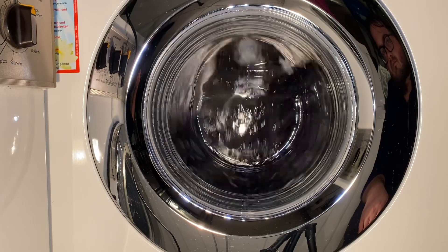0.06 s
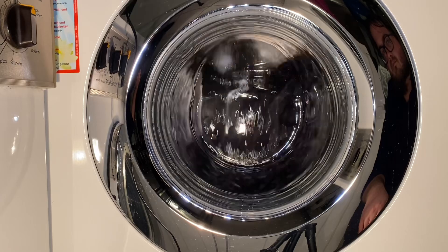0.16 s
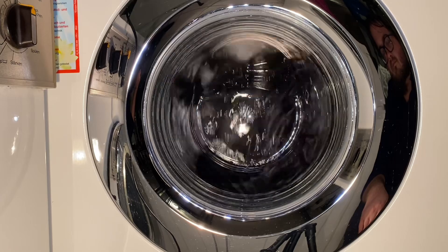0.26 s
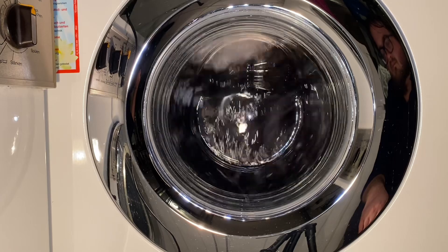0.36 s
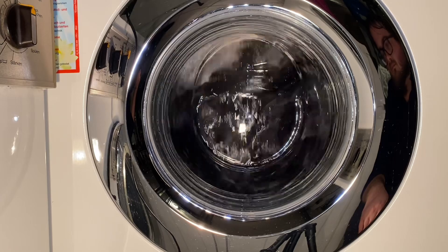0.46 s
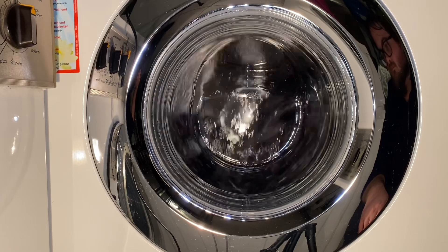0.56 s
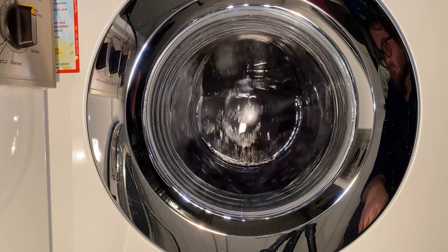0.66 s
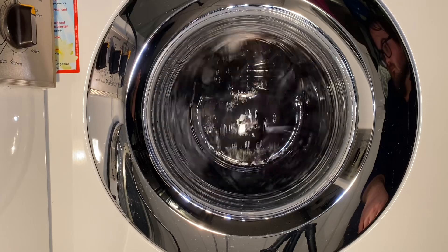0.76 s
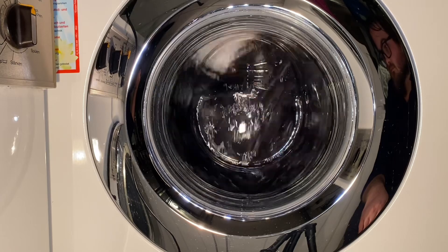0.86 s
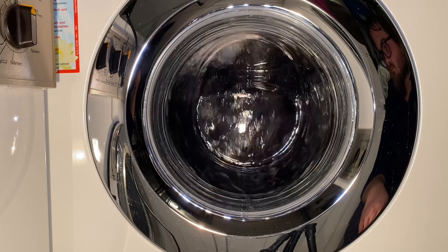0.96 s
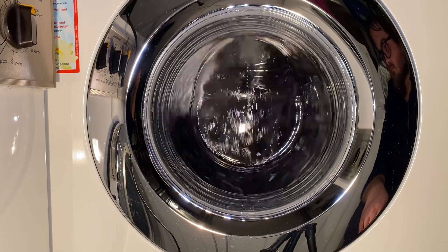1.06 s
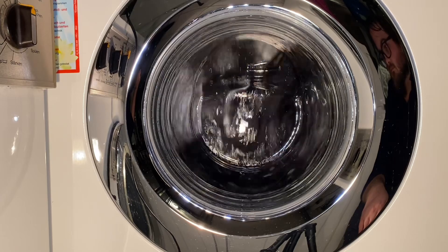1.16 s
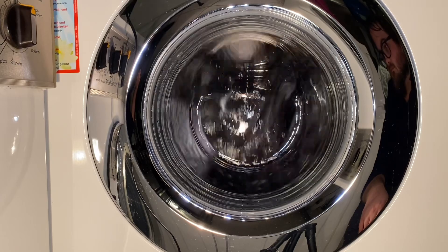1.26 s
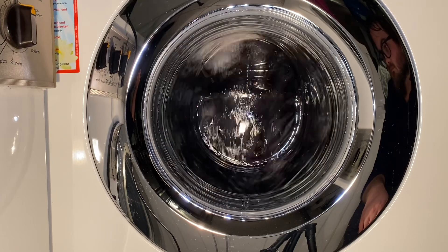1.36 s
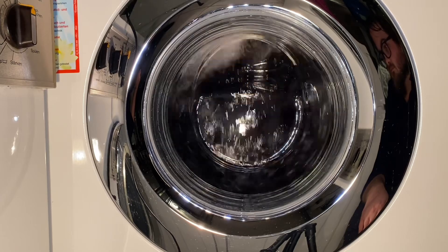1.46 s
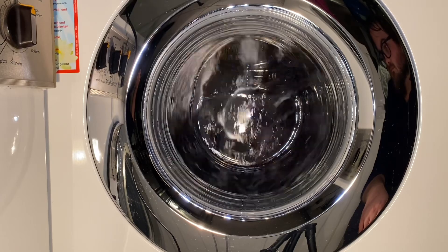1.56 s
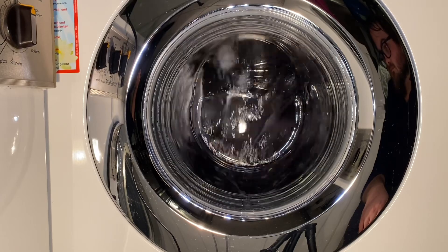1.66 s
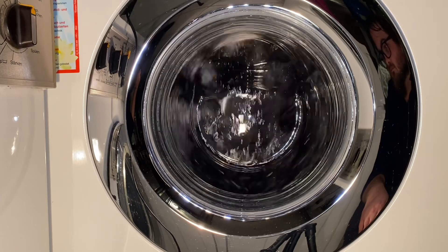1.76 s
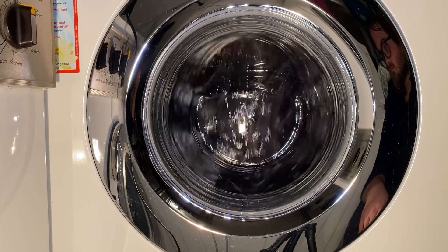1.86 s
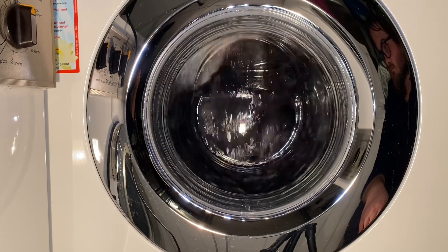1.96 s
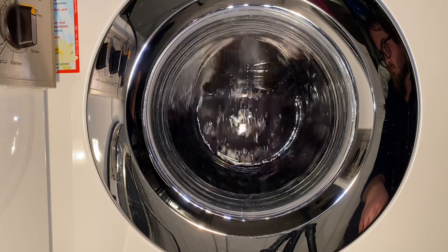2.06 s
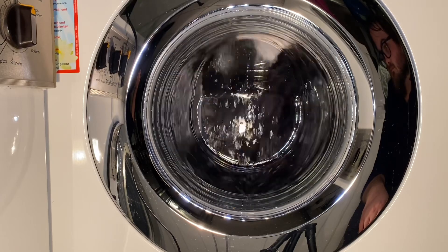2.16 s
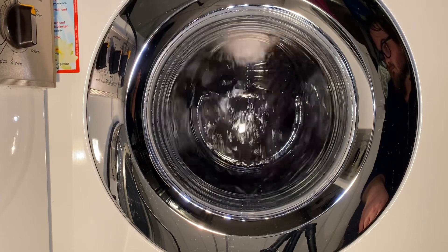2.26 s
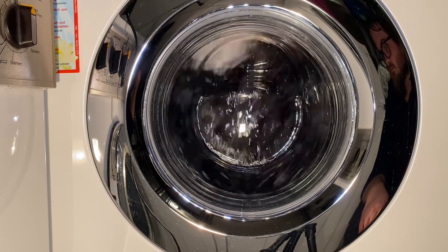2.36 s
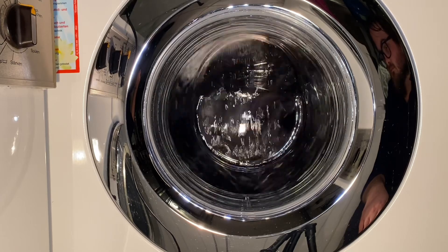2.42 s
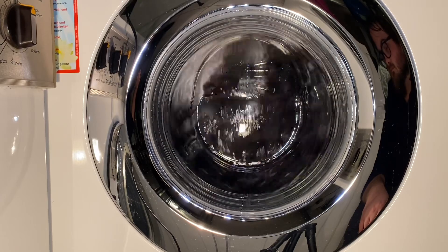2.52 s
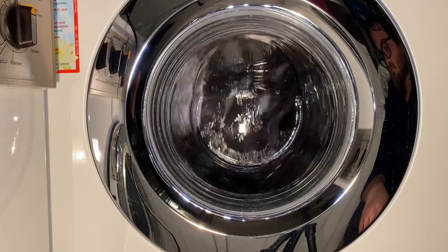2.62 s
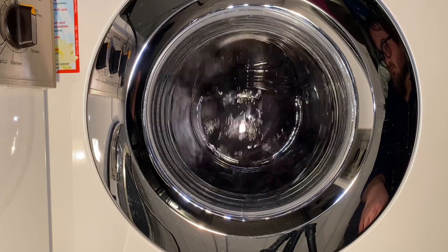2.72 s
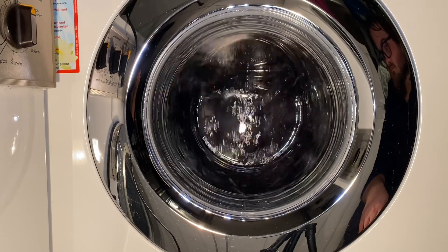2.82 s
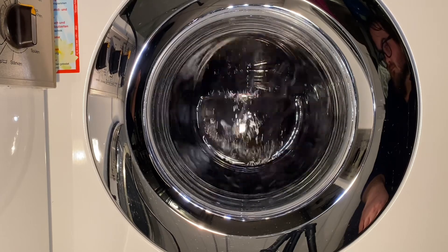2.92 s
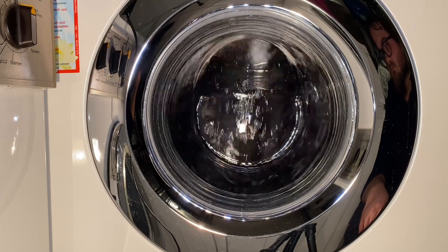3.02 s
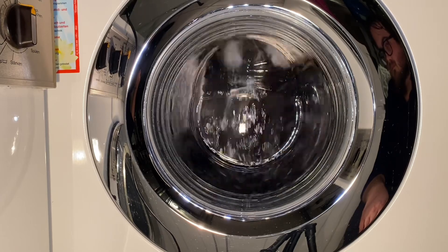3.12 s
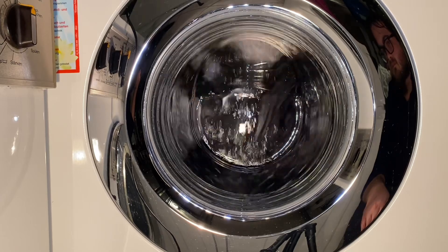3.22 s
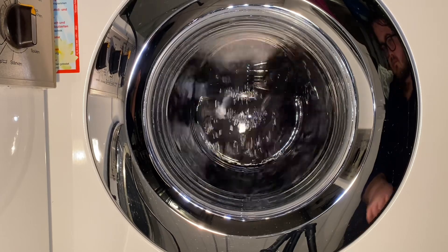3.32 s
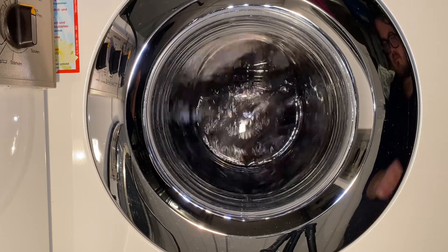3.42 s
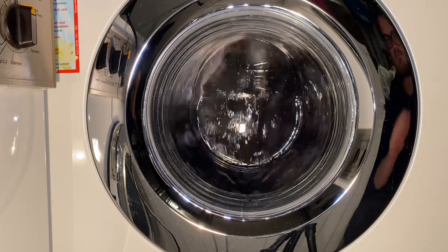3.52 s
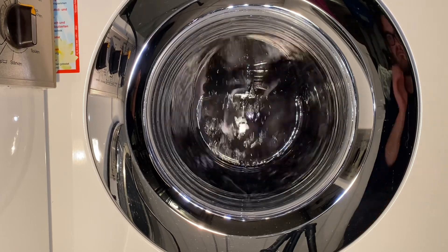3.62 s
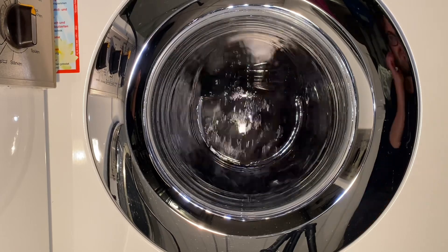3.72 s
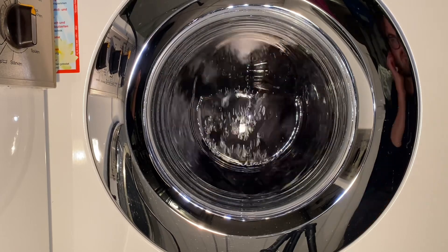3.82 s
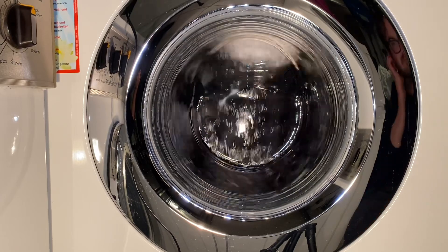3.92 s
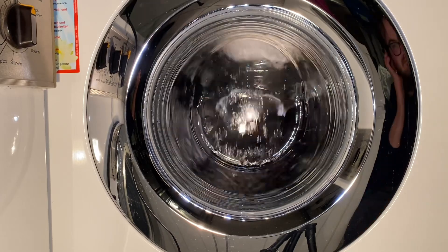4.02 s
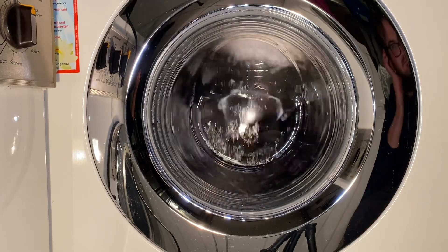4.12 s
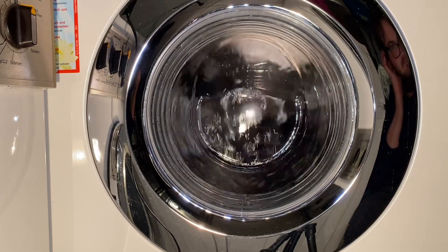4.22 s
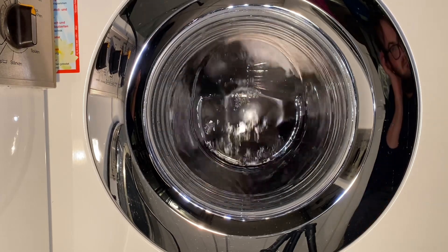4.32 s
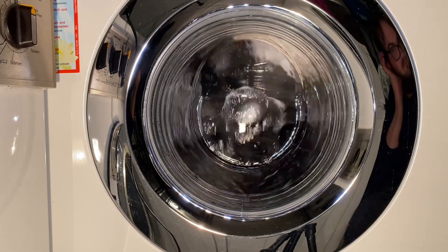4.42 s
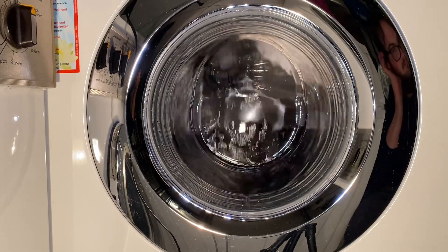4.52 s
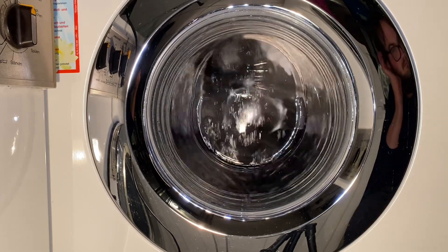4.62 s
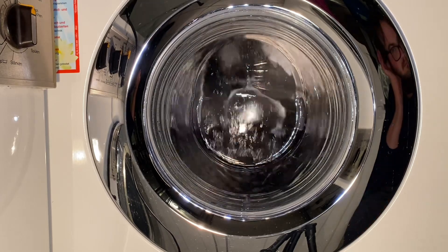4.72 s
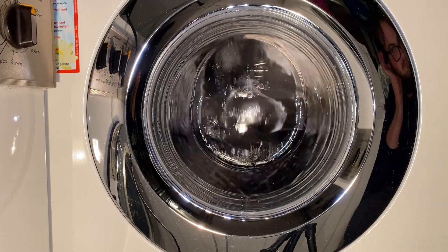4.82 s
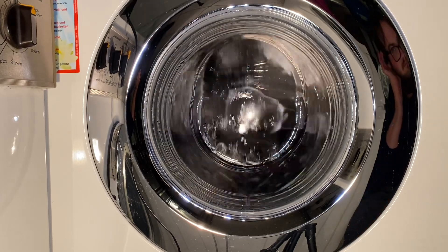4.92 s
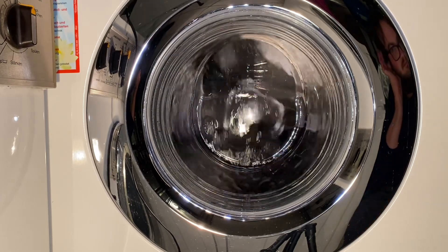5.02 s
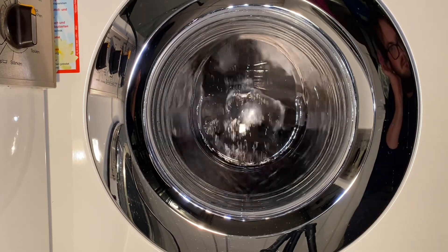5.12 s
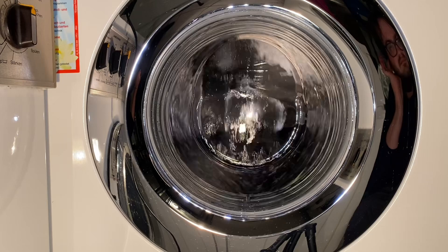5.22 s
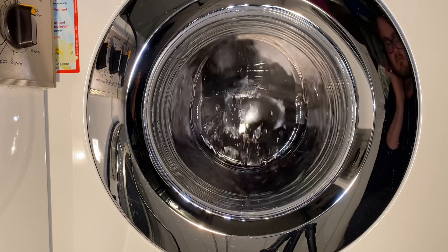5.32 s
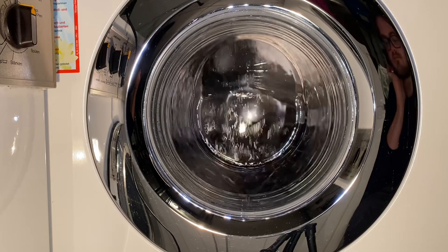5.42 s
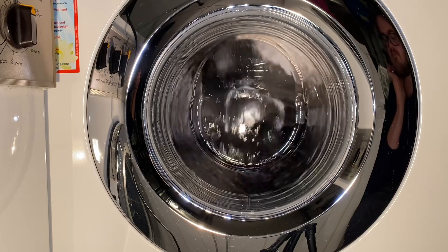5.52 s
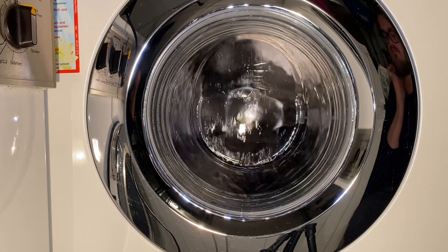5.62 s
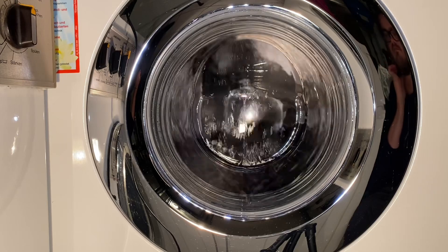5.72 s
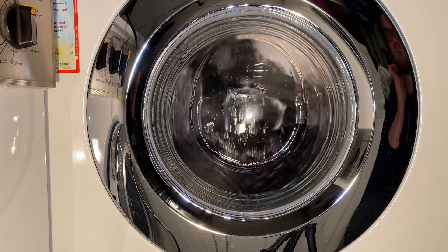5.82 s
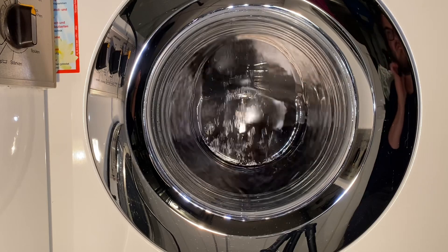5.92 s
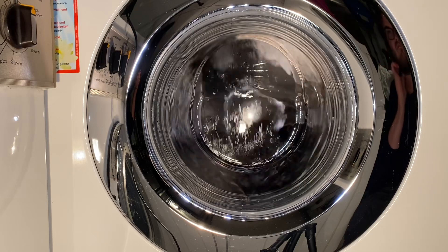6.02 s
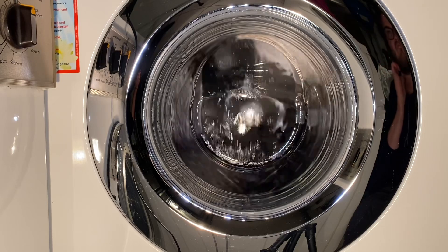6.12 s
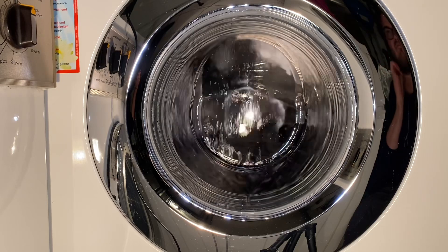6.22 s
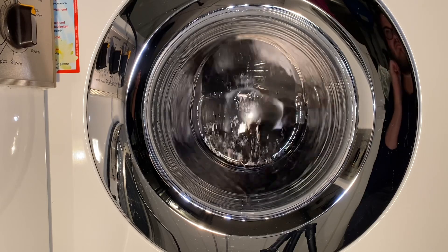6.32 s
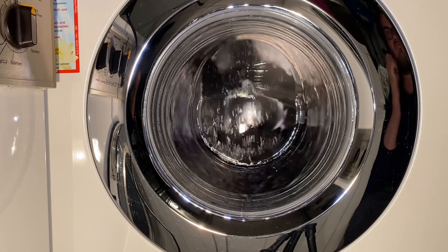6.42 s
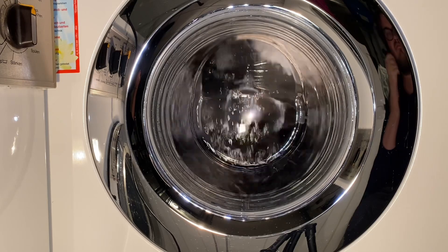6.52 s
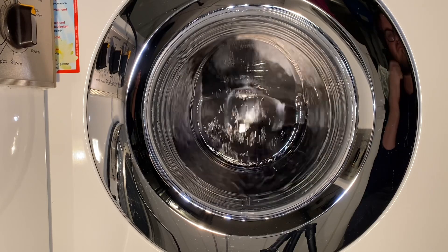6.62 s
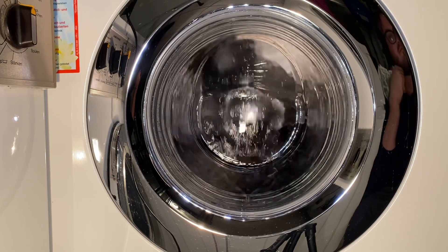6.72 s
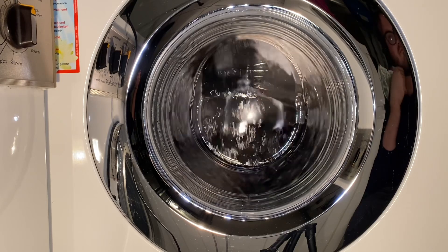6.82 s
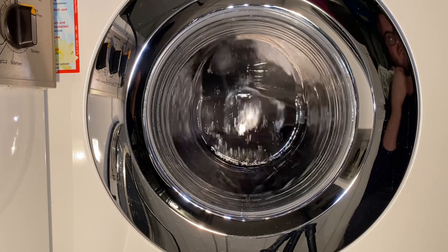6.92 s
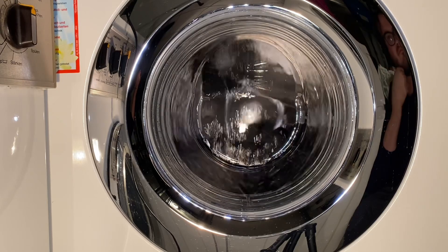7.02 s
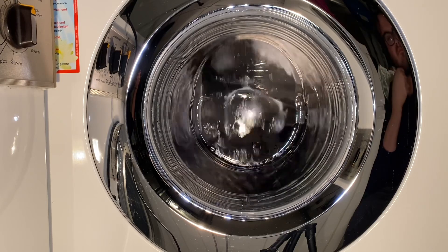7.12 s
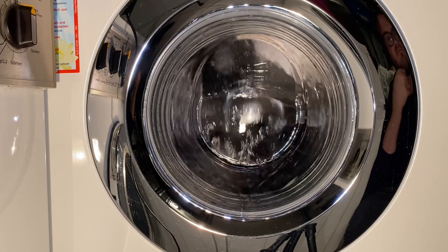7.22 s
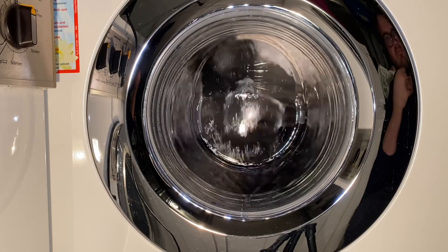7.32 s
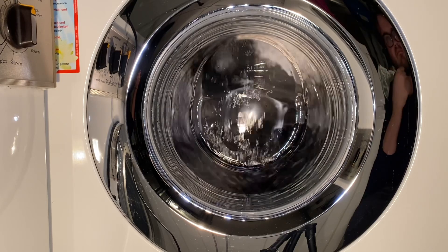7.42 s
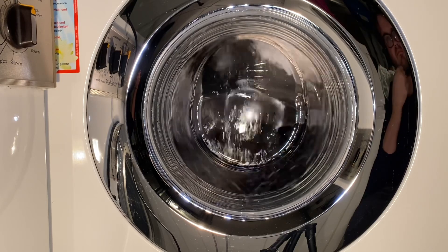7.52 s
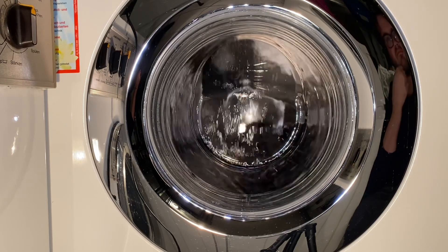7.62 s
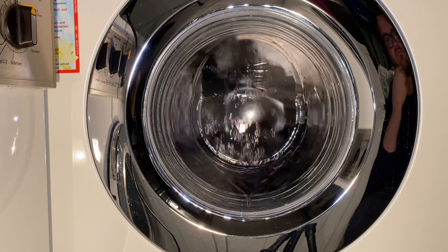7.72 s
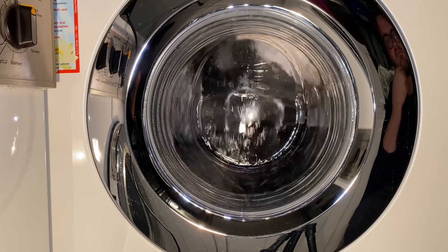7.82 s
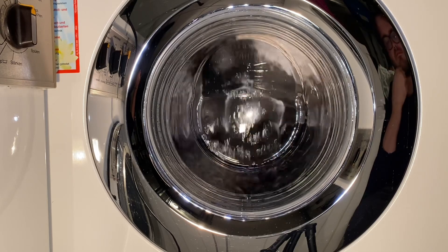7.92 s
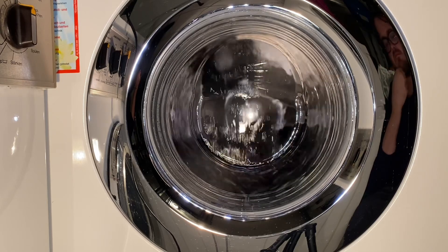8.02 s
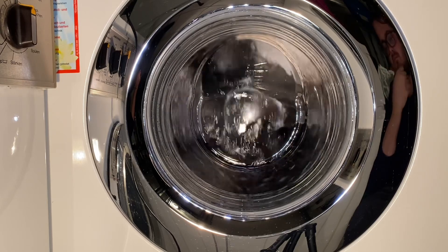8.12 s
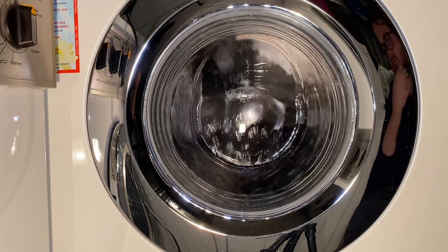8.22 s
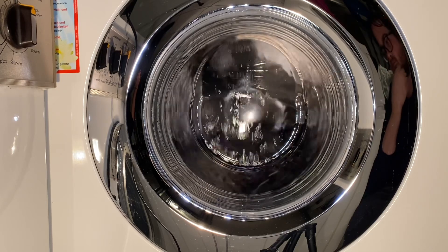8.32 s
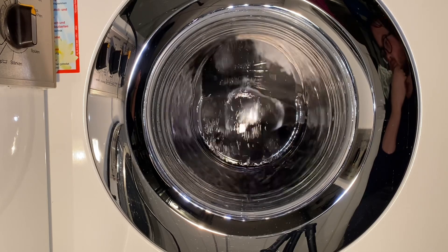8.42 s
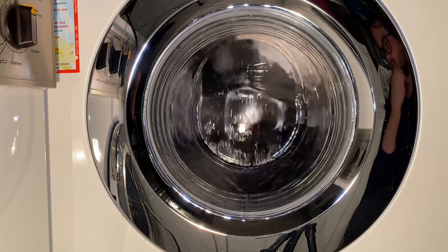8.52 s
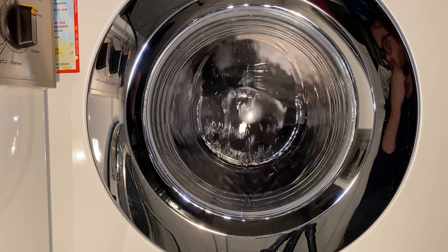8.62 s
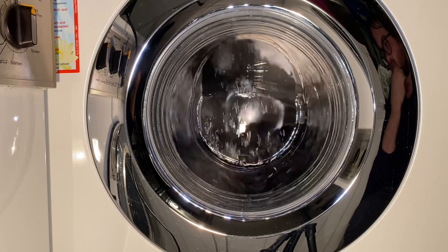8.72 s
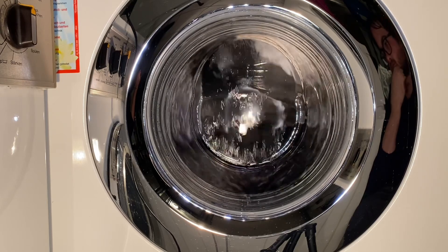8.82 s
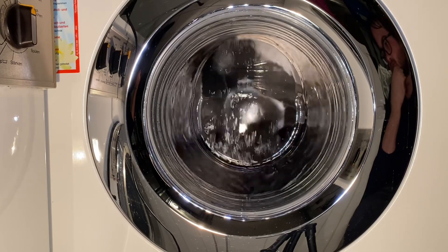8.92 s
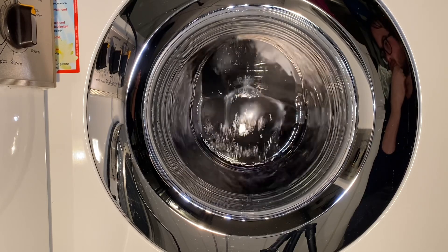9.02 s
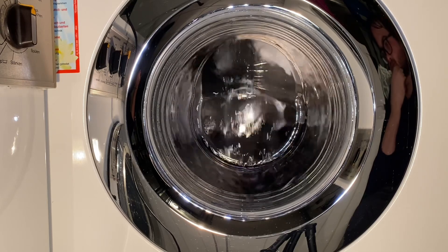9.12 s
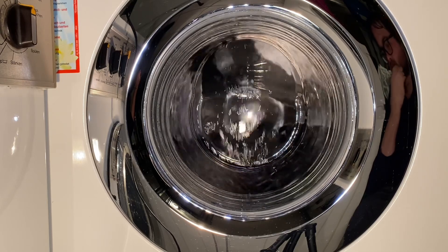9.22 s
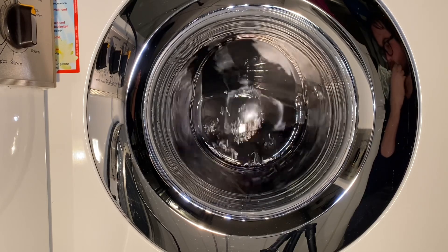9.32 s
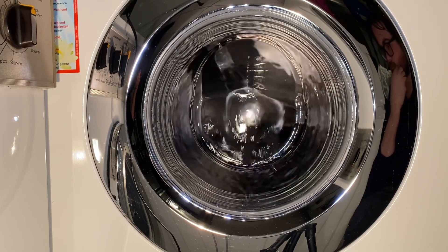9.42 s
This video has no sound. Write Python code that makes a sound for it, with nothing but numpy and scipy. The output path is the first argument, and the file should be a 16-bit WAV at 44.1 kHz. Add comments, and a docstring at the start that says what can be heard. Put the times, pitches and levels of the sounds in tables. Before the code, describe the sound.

Close to a front-loading washing machine in a small home room. Wet laundry flops and thumps in the steel drum for about four seconds, with a few hollow knocks, while water sloshes and sprays brightly and drops tick on metal. Then the thumps stop and hissing patter continues over low hum and rumble. Near the end the treble drops away, leaving faint bass and small ticks.

```python
"""A front-loading washing machine heard from just outside its glass door. Wet laundry thumps in the
steel drum, mostly in the first 4 s: shaped noise and short blows drive modes, knocks ring as decaying sines.
Drops and buttons tap the steel (puffs of noise into wall modes, short noise bursts); water sloshes, patters
and sprays as filtered noise; the cabinet rumbles over a motor hum. Taps, thumps and knocks echo in the room.
Near the end the machine's steady layers fade unevenly, the treble more than the bass."""
import sys
import numpy as np
from scipy import signal
from scipy.fft import rfft, irfft, next_fast_len
from scipy.io import wavfile
from scipy.ndimage import uniform_filter1d, map_coordinates

SR = 44100
rng = np.random.default_rng(int(sys.argv[2]) if len(sys.argv) > 2 else 0)


def wrap_up_sound(samples):
    """Save the sound to the file named by the first command line argument, as 16-bit audio."""
    columns = np.atleast_2d(samples).T
    # keep every value between -1 and 1, then stretch to whole-number steps
    tamed = np.clip(columns, -1, 1)
    steps = np.round(tamed * 32767).astype(np.int16)
    wavfile.write(sys.argv[1], SR, steps)


N = 417186

# modes of drum and door: (frequency [Hz], width [Hz], gain [dB])
DRUM_MODES = [(386, 34, 0.5), (464, 13, -3.5), (526.3, 37.4, 0.5), (613, 370, -20.5), (734, 39, -1),
              (1000, 205, 1), (1160, 35, 2.5), (1249, 30, 1), (1478, 33, 5), (1494, 180, -5.5),
              (1778, 110, -5), (1926, 82, -4.5), (2314, 77, -7), (2378, 55, -7.5), (3000, 250, -27.5),
              (3780, 510, -44), (3920, 15, -7.5)]
# modes of the drum wall in five groups: (frequency [Hz], width [Hz], gain [dB])
STEEL_LOW = [(2410, 40, 4), (2600, 25, -9.5), (2450, 37, -20), (2850, 560, -14)]
STEEL_MIDDLE = [(3483, 71, 0), (3614, 30, -3), (3720, 57, 2), (3840, 32, -2.5)]
STEEL_RIB = [(3916, 12.5, 4.5)]
STEEL_HIGH = [(4570, 20, -6), (4733, 55, -2.5), (4980, 38, -6.5), (5157, 105, 4), (5183, 30, 0),
              (5270, 61, -6), (5160, 670, -11.5)]
STEEL_TOP = [(5580, 30, -2), (5647, 45, 2.5), (5850, 73, -0.5), (6060, 26, 3.5), (6127, 35, 2.5),
             (6010, 360, -13), (6256, 78, -1.5), (6414, 90, 2.5), (6850, 280, -4.5), (7200, 120, -5),
             (7514, 57, -3), (7575, 50, -3)]
STEEL_GROUPS = (STEEL_LOW, STEEL_MIDDLE, STEEL_RIB, STEEL_HIGH, STEEL_TOP)
# clear drops and buttons on the steel:
# (time [s], nominal level [dB], low ring re that level [dB], pitch of upper ring and burst [Hz])
CLEAR_TAPS = [(0.033, -51, -5, 5200), (0.165, -50, -12, 5100), (0.221, -43.5, -11, 5360),
              (0.324, -40.5, -15, 4560), (0.378, -43, -16, 5200), (0.4967, -48.5, 4.5, 4900),
              (0.522, -46, -2, 3950), (0.5837, -45, -24, 5330), (0.6569, -59.5, 4, 3900),
              (0.7552, -45, -23.5, 5230), (0.882, -40.5, -1, 4000), (0.993, -38.5, -16, 5530),
              (1.12, -40.5, -23, 6750), (1.1437, -48, -17, 6500), (1.1646, -46, -9, 6060),
              (1.187, -52, 3, 4040), (1.308, -45, -21, 5200), (1.426, -50, 8, 4800), (1.4521, -48, 3, 3470),
              (1.5788, -44.5, -24, 5300), (1.696, -40, -23, 5730), (1.761, -52, 3, 4630),
              (1.7923, -48.5, -8, 6270), (1.967, -46, 4.5, 3900), (2.1416, -44, -16, 5540),
              (2.407, -44, -13, 5430), (2.441, -48, 4, 3870), (2.5346, -50, -12, 5120),
              (2.6369, -50, -3, 3580), (2.7067, -43, -28, 5400), (2.7385, -47, -2, 4630),
              (2.8, -47, -15.5, 5430), (2.9575, -54, 5, 4000), (3.0974, -51, 4, 3950),
              (3.122, -49, -14, 3924), (3.15, -52, -14, 3924), (3.371, -48, -13, 3550),
              (3.406, -41.5, -8, 5100), (3.5364, -45.5, -5, 4000), (3.6496, -57, -3, 3900),
              (3.6784, -49, -20, 5100), (3.746, -40, -8.5, 5160), (3.7938, -50, -4, 5170),
              (3.825, -44.5, 1.5, 4060), (3.919, -42.5, -8.5, 5260), (3.9795, -43, -9, 5340),
              (4.0482, -44.5, -19.5, 6000), (4.09, -49, -23.5, 5870), (4.155, -58, -23.5, 4820),
              (4.315, -38, -14, 5400), (4.5534, -54, -1.5, 5120), (4.678, -46.5, -9, 5000),
              (4.8194, -46, -18, 4970), (4.9653, -44.5, -7, 5550), (5.0954, -46, -16, 3480),
              (5.3582, -49, -10, 5100), (5.4507, -37, -10, 5130), (5.517, -47, -22, 3520),
              (5.541, -43, -19, 4620), (5.578, -52, 2, 3780), (5.6052, -47, -8, 6700),
              (5.6211, -58, 4, 3700), (5.684, -57, -1, 3800), (5.7156, -52, -19.5, 3750),
              (5.735, -47, -27, 5170), (5.756, -49, -22, 5470), (5.908, -39, -23, 5100),
              (6.042, -50, 3.5, 5140), (6.072, -56, -2, 5400), (6.12, -55, 6, 5160),
              (6.1664, -47, -13, 5270), (6.2326, -52.5, 3, 4860), (6.2627, -42.5, -5.5, 5600),
              (6.288, -56, -1, 5200), (6.512, -56, 6.5, 3600), (6.5894, -43.5, -15, 5130),
              (6.592, -51, -16, 3600), (6.716, -45.5, -6, 5170), (7.224, -46, -6.5, 5330),
              (7.248, -45, -12, 5300), (7.3373, -49, -11, 5170), (7.452, -51, 1, 5200),
              (7.5727, -47, -15.5, 5700), (7.607, -44, -13, 7460), (7.665, -36, -23, 5660),
              (7.7444, -41.5, -8, 5900), (7.807, -43.5, -22.5, 6460), (7.9044, -48, -25, 5150),
              (7.9938, -44, -9, 4900), (8.313, -44, -14.5, 5260), (8.3454, -56.5, 2, 3900),
              (8.3809, -44, -8, 4670), (8.4662, -51, -1, 5060), (8.618, -47.5, -25, 5000),
              (8.6195, -50, -24, 3570), (8.6567, -61, 5, 3900), (8.747, -56, 5, 5110),
              (8.768, -52, -23, 3640), (8.807, -49, -10, 2930), (8.809, -56, -20, 3570),
              (8.96, -64, -14, 3924), (8.972, -53, -30, 1740), (8.998, -69, -30, 1650),
              (9.044, -54, -14, 3460), (9.0993, -53.5, -11, 5200), (9.162, -63, -10, 2690),
              (9.178, -59, -11, 3900), (9.2015, -62, -14, 3924), (9.336, -58, -14, 2500),
              (9.348, -60, -20, 2800), (9.362, -61, -15, 2880), (9.385, -70, -22, 2980)]
# stereo likeness of most sources: (frequency [Hz], left-right correlation [0-1])
ALIKE = [(20, .98), (170, .98), (300, .95), (600, .78), (1200, .52), (2500, .72), (5000, .65), (8000, .7)]


def amp(db):
    """dB to amplitude."""
    return 10 ** (np.asarray(db) / 20)


def unit(x):
    """Scale to rms 1."""
    return x / np.sqrt(np.mean(x ** 2) + 1e-20)


def along(points, hz):
    """Interpolate (Hz, value) points on a log frequency axis."""
    f, v = np.transpose(points)
    return np.interp(np.log(hz + 1), np.log(f + 1), v)


def curves(rows):
    """One value per sample for each column after the time; end values are held."""
    s, *cols = np.transpose(rows)
    return [np.interp(np.arange(N) / SR, s, c) for c in cols]


def wobble(knots_per_s):
    """Smooth random curve through normal-distributed knots."""
    knots = rng.standard_normal(int(N * knots_per_s / SR) + 4)
    return map_coordinates(knots, [np.arange(N) * knots_per_s / SR])


def filtered(x, response):
    """Apply a complex frequency response by FFT."""
    m = next_fast_len(N + SR // 2)
    return irfft(rfft(x, m) * response(np.fft.rfftfreq(m, 1 / SR)), m)[..., :N]


def resonant(modes):
    """Causal response of parallel band-pass modes of alternating sign."""
    def response(f):
        total = 0
        for k, (centre, width, db) in enumerate(modes):
            damping = 1j * f * width
            total = total + (-1) ** k * amp(db) * damping / (centre * centre - f * f + damping)
        return total
    return response


def spread(pair, alike, response):
    """Two unrelated signals become left and right, as alike as asked, through one response."""
    def mid_side(hz):
        turn = np.arccos(np.clip(along(alike, hz), -1, 1)) / 2
        return response(hz) * np.array([np.cos(turn), np.sin(turn)])
    mid, side = filtered(pair, mid_side)
    return np.array([mid + side, mid - side])


def rush(spectrum, alike, patchy_db):
    """Stereo noise of rms 1 with time-frequency patches of random gain."""
    z = signal.stft(rng.standard_normal((2, N)), nperseg=512)[2]
    field = rng.standard_normal(z.shape[1:])
    field = uniform_filter1d(uniform_filter1d(field, 10, 0), 5, 1)
    pair = signal.istft(z * amp(patchy_db * unit(field)), nperseg=512)[1][:, :N]
    return unit(spread(pair, alike, lambda hz: amp(along(spectrum, hz))))


def scattered(level_db, usual_hz, count):
    """Rows of (s, dB, Hz) at random moments, 0-9 dB over a level curve, within 0.45 octave of a pitch."""
    at, size, pitch = rng.random((count, 3)).T
    db = level_db[(at * N).astype(int)] + 9 * size
    return np.c_[at * N / SR, db, usual_hz * 2 ** (.9 * (pitch - .5))]


def bursts(rows, decay_s, usual_hz):
    """Rows of (s, dB, Hz) become short noises around their pitch, with a thin bright edge."""
    burst_db, width_octaves = -8.5, 0.15
    sizzle_db, sizzle_hz = -15.5, 9700
    slowing_power = 0.64  # lower bursts come from bigger drops and last longer
    out, t = np.zeros(N + SR), np.arange(2048) / SR
    hz = np.fft.rfftfreq(len(t), 1 / SR) + 1

    def bell(centre_hz):
        return np.exp(-(np.log2(hz / centre_hz) / width_octaves) ** 2)

    for (s, db, pitch_hz), noise in zip(rows, rng.standard_normal((len(rows), len(t)))):
        colour = bell(pitch_hz) + amp(sizzle_db) * bell(sizzle_hz)
        burst = unit(irfft(rfft(noise) * colour))
        u = t / decay_s * (pitch_hz / usual_hz) ** slowing_power
        out[round(s * SR):][:len(t)] += amp(db + burst_db) * burst * u ** 0.68 * np.exp(-u)
    return out[:N]


def thumps():
    """A soft load lands in lumps over some tens of ms: rough pushes and firm blows into the modes."""
    # wet laundry landing: (time [s], nominal level [dB], boom [dB], thud [dB], slap [dB], splash [dB],
    # rise of body, slap and splash [ms], length [ms]); the four parts are relative to the level
    landings = [(0.035, -54, 1, -7, 14.5, 8, 4.8, 17), (0.085, -51, 7, -6, 5, -16, 4.1, 21),
                (0.407, -45.5, 5, 7.5, -3.5, -1, 5.6, 36), (0.489, -50, -3, -3, -4, -6, 4.6, 43),
                (0.53, -50.5, -6, -9, 0, -17, 4.1, 23), (0.88, -34.5, -2, -2.5, -3.5, -3.5, 4.5, 40),
                (1.005, -46, 6, 3, 0, -11, 3.6, 22), (1.06, -53.5, -3, -11, 9, -5, 5.9, 20),
                (1.182, -41.5, -24, -23, 0.5, -4, 2.8, 44), (1.384, -48.5, -1, -4, 2.5, -1.5, 9, 54),
                (1.427, -42.5, 2, 6.5, -8, -7, 4.9, 43), (1.48, -44.5, 5, 1, -4, -14, 3.3, 28),
                (1.505, -43, 7, -4, 1.5, -11, 4, 25), (1.528, -52, -10, 0, 2, 2, 5, 22),
                (1.642, -53, -25, -8, 6, -5, 7.2, 55), (1.804, -55, 5, 4, 2, 2.5, 3.4, 45),
                (1.864, -61, -4, -0.5, -2, 11, 3.8, 18), (1.968, -39.5, 5, 8.5, -2.5, -2.5, 1.97, 35),
                (2.072, -45.5, 5, 2, -15, -3.5, 3.9, 25), (2.141, -32.5, -1.5, -8.5, -1.5, -3.5, 6.9, 25),
                (2.424, -41.5, 3, 3.5, -6, -1.5, 7.1, 50), (2.49, -52.5, 15.5, -13, -18, -25, 3.5, 51),
                (2.544, -48, 12, 10, 5, -3, 4, 14.6), (2.714, -52.5, -14, 2, 7, -5, 2.9, 18),
                (2.804, -49.5, 5.5, 9.5, -1, -1, 2.56, 51), (2.889, -47.5, 9, -4, -2, -2, 9, 36),
                (3.059, -29, -12, -6.5, -4.5, -7.5, 1.4, 29.5), (3.094, -38, -1, 5.5, -7.5, -2, 4, 22),
                (3.115, -46, 10, 5, -4, -5, 8, 55), (3.16, -53, 15, 13.5, -3, -8, 8, 35),
                (3.419, -45, -5, 6.5, 0, 1, 5.8, 39), (3.458, -43.5, 2.5, -6.5, -13, -6, 4.7, 73),
                (3.745, -56, -2, -2, 7, -7, 3.4, 20), (3.831, -52.5, 8, -22, -2, 1.5, 3.7, 71),
                (8.404, -55, 11, 11, 5.5, 6, 4.2, 28), (8.432, -54.5, 10, 8, -10, -17, 4.4, 21),
                (8.868, -64.5, 16, 8, 0, 2, 3.3, 47), (8.938, -62.5, 25, 9, -14, -10, 2.9, 12),
                (9.0, -65.5, 17, 9, -17, -14, 3.9, 25), (9.045, -68.5, 20, 12, -6, -1, 2, 29),
                (9.165, -65.5, 7, -6, 0.5, -3.5, 3.3, 54), (9.335, -75.5, 9, 1, -4, -2, 3.3, 46),
                (9.425, -71, 19, 4, -5, -13, 3.6, 21)]
    # lowest cabinet modes: (frequency [Hz], width [Hz], gain [dB])
    boom_modes = [(88.5, 33, -7.5), (139.4, 16.6, 5), (217, 9.6, -2.5)]
    # door mode: (frequency [Hz], width [Hz], gain [dB])
    door_modes = [(281.6, 29.3, 6)]
    # edges of the slap, between body and splash: (frequency [Hz])
    slap_edges_hz = [694, 1410]
    low_rise_ratio = 1.328  # boom and thud rise slower than body, slap and splash
    fall_power = 1.49  # above 1 a landing holds, then drops away
    tail_db, tail_lengths = -15.5, 2.32  # water runs off after a landing
    blow_db, blow_ms, scuff_db = 21.5, 2.46, -4  # one firm blow over a weaker rough push
    soft_hz = 6800  # wet cloth gives no treble

    # rows: boom, thud, body, slap, splash
    push, blows = np.zeros((5, 1, N + SR)), np.zeros((2, N + SR))
    ms = np.arange(SR // 3) / SR * 1000
    for s, db, boom_db, thud_db, slap_db, splash_db, rise_ms, length_ms in landings:
        rise = rise_ms * np.c_[[low_rise_ratio, low_rise_ratio, 1, 1, 1]]
        fall = np.exp(-(ms / length_ms) ** fall_power)
        runoff = amp(tail_db) * np.exp(-ms / length_ms / tail_lengths)
        shape = (1 - np.exp(-ms / rise)) ** 2 * (fall + runoff)
        gain = amp(db + np.c_[[boom_db + 26, thud_db + 23, 19, slap_db + 19, splash_db + 19]])
        span = slice(round(s * SR), round(s * SR) + len(ms))
        push[:, 0, span] += gain * shape
        blow = np.exp(-((ms - 2 * rise[0]) / blow_ms * 2) ** 2)
        blows[:, span] += gain[:2] * amp(blow_db) * blow / blow.sum()

    lumps = amp(3 * np.array([[wobble(90)] for _ in push]))
    low, door, *load = push[..., :N] * lumps * rng.standard_normal((5, 2, N))
    mid_only = np.c_[[1, 0]]  # equal left and right
    low, door = amp(scuff_db) * np.array([low, door]) + blows[:, None, :N] * mid_only

    def bands(hz):
        below = 1 / (1 + (hz / np.c_[slap_edges_hz]) ** 4)
        return np.diff(np.vstack([0 * hz, below, 1 + 0 * hz]), axis=0)[:, None]

    def soft_drum(hz):
        return resonant(DRUM_MODES)(hz) / (1 + 1j * hz / soft_hz) ** 4

    load = filtered(np.array(load), bands).sum(0)
    return (spread(low, ALIKE, resonant(boom_modes)) + spread(door, ALIKE, resonant(door_modes))
            + spread(load, ALIKE, soft_drum))


def knocks():
    """A knock or drip rings at one pitch: a sine that swells in softly and decays."""
    # (time [s], nominal peak [dB], pitch [Hz], decay [ms])
    ringing_hits = [(.886, -37, 1100, 9.9), (.893, -40, 820, 8), (.922, -44, 538, 7.8),
                    (1.474, -43, 774, 12), (1.513, -41, 852, 8), (2.144, -30.5, 383, 11),
                    (2.150, -40, 1054, 9), (2.154, -30, 531, 20), (2.165, -37.5, 732, 17),
                    (3.061, -29, 677, 9.9), (3.061, -44, 1965, 14), (3.064, -27.5, 511, 17),
                    (3.078, -31, 510, 11), (3.082, -36.5, 1180, 15), (3.094, -37.5, 745, 18),
                    (8.41, -54, 1840, 13), (8.874, -41, 140, 16), (8.972, -60, 1700, 9),
                    (9.004, -46, 130, 14)]
    rise_ms = 3.9
    out, ms = np.zeros(N + SR), np.arange(SR // 5) / SR * 1000
    for s, db, hz, decay_ms in ringing_hits:
        shape = (1 - np.exp(-ms / rise_ms)) ** 2 * np.exp(-ms / decay_ms)
        turns = hz * ms / 1000 + rng.random()
        out[round(s * SR):][:len(ms)] += amp(db) * shape / shape.max() * np.sin(2 * np.pi * turns)
    return out[:N]


def taps(patter_db, count=900):
    """Each contact is a short wet puff into the steel's modes; many faint ones join the clear ones."""
    # centres of the four upper steel groups: (frequency [Hz])
    upper_hz = [3650, 3924, 5000, 6300]
    # loss of each upper group with distance from a tap's pitch: (slope [dB/octave])
    fall_db_per_octave = [33.7, 110, 34.5, 34.5]
    scatter_db = 1
    s, db, low_db, hz = np.transpose(CLEAR_TAPS)
    octaves_off = np.abs(np.log2(np.c_[upper_hz] / hz))
    upper_db = -np.c_[fall_db_per_octave] * octaves_off
    upper_db = upper_db + scatter_db * rng.standard_normal(upper_db.shape)
    clear_db = db + np.vstack([low_db, upper_db]) + np.c_[[28, 22, 24.5, 24, 20]]

    at = rng.random(count) * N / SR
    faint_db = patter_db[(at * SR).astype(int)] + np.c_[[23, 24, 22, 25, 25]]
    faint_db = faint_db + 4 * rng.standard_normal(faint_db.shape)

    starts = np.zeros((len(clear_db), N))
    starts[:, (np.r_[at, s] * SR).astype(int)] = amp(np.hstack([faint_db, clear_db]))
    t = np.arange(SR // 20) / SR
    puff = (1 - np.exp(-t / 0.0071)) * np.exp(-t / 0.0049)
    envelope = signal.fftconvolve(starts, puff[None], axes=1)[:, :N]
    push = envelope[:, None] * rng.standard_normal((len(clear_db), 2, N))
    return sum(spread(p, ALIKE, resonant(modes)) for p, modes in zip(push, STEEL_GROUPS))


def splats(patter_db):
    """Each clear tap also makes a short noise burst around its pitch; faint bursts spatter in between."""
    usual_hz, decay_s = 5230, 0.0035
    faint = scattered(patter_db + 12.5, usual_hz, count=800)
    clear = np.array(CLEAR_TAPS)[:, [0, 1, 3]]
    return bursts(np.vstack([faint, clear]), decay_s, usual_hz)


def slosh_and_trickle(slosh_db, trickle_db):
    """Water and cloth move behind the door: noise coloured by the drum, split near 900 Hz."""
    # (frequency [Hz], relative density [dB])
    water_spectrum = [(120, -17.5), (200, -2), (274, -2.5), (329, -9), (392, -4.5), (430, -12), (461, -8.5),
                      (560, -8.5), (680, -9.5), (800, -6.5), (900, -11.5), (980, -12), (1200, -17),
                      (1262, -11), (1300, -19), (1360, -15), (1510, -13.5), (2160, -19), (2480, -16),
                      (2720, -21.5), (3200, -23.5), (4160, -35), (7040, -120)]
    # moving water fills the whole drum, so it is wider: (frequency [Hz], left-right correlation [0-1])
    water_alike = [(160, .97), (270, .87), (450, .43), (740, .5), (1220, .25), (2000, .45), (3300, .5)]
    water = rush(water_spectrum, water_alike, patchy_db=1.2)
    water = filtered(water, lambda hz: np.hypot(1, np.abs(resonant(DRUM_MODES)(hz))))
    heavy = filtered(water, lambda hz: 1 / (1 + (hz / 900) ** 4))
    unsteady = amp(0.5 * wobble(6.4) + 0.46 * wobble(40))
    return unsteady * (amp(slosh_db) * unit(heavy) + amp(trickle_db) * unit(water - heavy))


def patter(patter_db, spurts_db):
    """Dense patter on the wet wall: patchy noise plus its ringing in all the steel modes."""
    # (frequency [Hz], relative density [dB])
    patter_spectrum = [(1500, -21), (2500, -9), (3100, 0), (3700, -1.5), (4300, 6), (5200, 6), (6500, 0.5),
                       (7800, 5.5), (9000, -117.5)]
    drops = rush(patter_spectrum, ALIKE, patchy_db=2.0)
    all_steel = STEEL_LOW + STEEL_MIDDLE + STEEL_RIB + STEEL_HIGH + STEEL_TOP
    ringing = unit(filtered(drops, resonant(all_steel)))
    return amp(patter_db + spurts_db + 1.0 * wobble(11)) * (drops + amp(5.0) * ringing)


def spray(spray_db, spurts_db):
    """Bright spray: noise and bursts, nearly alike left and right, phase difference linear in frequency."""
    # (frequency [Hz], relative density [dB])
    spray_spectrum = [(3000, -33), (5500, -8), (7000, -6), (7800, 6), (8600, 8.5), (9200, 9.5), (10000, 8),
                      (10800, 9), (12400, 9), (13100, 5), (14200, 3), (14700, 6), (15700, 5)]
    lag_s, in_step_hz = .000278, 10200  # left and right are in phase at in_step_hz
    fizz_hz, fizz_decay_s = 10900, 0.0052
    hiss = rush(spray_spectrum, [(1000, .99)], patchy_db=2.4)
    hiss = amp(spray_db + spurts_db + 1.8 * wobble(36)) * hiss
    fizz = bursts(scattered(spray_db + 6, fizz_hz, count=300), fizz_decay_s, fizz_hz)

    def phase_difference(hz):
        return np.exp(1j * np.pi * lag_s * (hz - in_step_hz) * np.array([[-1], [1]]))

    return filtered(hiss + fizz, phase_difference)


def rumble(rumble_db):
    """Cabinet panels rumble: low noise with a fast, small wobble."""
    # (frequency [Hz], relative density [dB])
    panel_spectrum = [(40, -47), (62, -23), (78, -14), (88, 0), (103, -11), (114, -4), (124, -3), (132, 4),
                      (141, 3), (152, -5.5), (172, -11.5), (248, -11.5), (275, -6.5), (330, -13),
                      (430, -80)]
    return amp(rumble_db + 0.84 * wobble(27)) * rush(panel_spectrum, ALIKE, patchy_db=-0.75)


def motor_hum():
    """Motor hum: harmonics of one slightly drifting pitch."""
    # (time [s], fundamental [Hz], level [dB])
    hum_track = [(0, 100, -56), (8.5, 100, -57.5), (8.9, 100, -67), (9.46, 100, -66)]
    # (multiple of the fundamental, relative level [dB])
    overtones = [(1, -0.5), (3, -30), (4, -14.5), (5, -23)]
    hum_hz, hum_db = curves(hum_track)
    turns = np.cumsum(hum_hz + .4 * wobble(4)) / SR
    tone = sum(amp(db) * np.sin(2 * np.pi * k * turns) for k, db in overtones)
    return amp(hum_db + .8 * wobble(6)) * np.sqrt(2) * tone


def levels():
    """dB curves of rumble, slosh, trickle, patter and spray: base, churn, drift and fade added."""
    # until the load clings to the wall it churns the water:
    # (time [s], churn [dB], rumble before the fade offset [dB])
    churn_track = [(0, 8.5, -49), (.25, 6, -51), (.55, 7, -49.5), (.85, 5, -54), (1.1, 5.5, -48.5),
                   (1.7, 5.5, -55), (2.1, 7, -53), (2.6, 6.5, -50.5), (3.0, 5, -52), (3.3, 5.5, -54),
                   (3.7, 5.5, -51), (4.1, 3, -53.5), (4.8, 2.5, -52.5), (5.7, 2.5, -55), (6.4, 3, -53),
                   (7, 2.5, -52.5), (7.8, 3, -52.5), (8.6, 2.5, -56)]
    # offsets, first row held until its time: (time [s], bass [dB], treble [dB])
    fade_track = [(8.55, 2, -13.5), (8.75, 5, -18), (8.9, 2.5, -23.5), (8.95, -3, -21), (9.0, 1, -39),
                  (9.08, -0.5, -35), (9.13, -4, -36), (9.17, -4, -28), (9.21, -9, -27), (9.25, -8.5, -43),
                  (9.33, -11, -43), (9.46, -8.5, -45)]
    # slosh, trickle, patter, spray:
    # (base level before offsets [dB], growth [dB per dB of churn], share of the treble offset)
    layer_rows = [(-59, 0.84, 0.17), (-62.5, 1.09, 0.34), (-58.5, 0.56, 1.042), (-52, 0.45, 0.99)]
    churn_db, rumble_db = curves(churn_track)
    bass_db, treble_db = curves(fade_track)
    out = [rumble_db + bass_db]  # the rumble has no drift
    for db, grows, share in layer_rows:
        fade_db = bass_db + share * (treble_db - bass_db)
        out.append(db + grows * churn_db + fade_db + .5 * wobble(3.5))
    return out


def house():
    """Deep background of the house: steady low noise."""
    # (frequency [Hz], relative density [dB])
    house_spectrum = [(15, -50), (20, -28), (29, -5), (38, -1), (47, -1), (58, 3.5), (70, -1), (110, -66)]
    return amp(-65.0) * rush(house_spectrum, ALIKE, patchy_db=2.5)


def room(x, size=16384):
    """Noise tails decay at each frequency's own speed; every block of input gets a new tail."""
    # (frequency [Hz], time to fall 60 dB [s])
    t60_rows = [(100, .3), (1000, .22), (2400, .12), (8000, .09)]
    # the room's share of a hit: (frequency [Hz], gain [dB])
    wet_gain = [(100, -30), (300, -24.5), (550, -6), (1200, -13), (2500, 0), (6000, -7)]
    x = filtered(x, lambda hz: amp(along(wet_gain, hz)))
    parts = np.pad(x, (0, -N % size)).reshape(-1, 1, size)
    hz, t, z = signal.stft(rng.standard_normal((len(parts), 2, size)), SR, nperseg=256)
    decay = amp(-60 * t / along(t60_rows, hz)[:, None])
    tails = signal.istft(z * decay, SR, nperseg=256)[1][..., :size]
    tails = tails / np.linalg.norm(tails, axis=2, keepdims=True)
    wet = signal.fftconvolve(parts, tails, axes=2)
    out = np.zeros((2, (len(parts) + 1) * size))
    for k, piece in enumerate(wet):
        out[:, k * size:][:, :piece.shape[1]] += piece
    return out[:, :N]


def scene():
    """Hits, steady layers, background and the echoes of the hits."""
    # thumps and knocks lean to the right: (frequency [Hz], left minus right [dB])
    load_left = [(150, 0), (300, -1.5), (500, -2.5), (800, -3.5), (1300, -2.5), (2500, 0)]
    rumble_db, slosh_db, trickle_db, patter_db, spray_db = levels()

    def lean(hz):
        return amp(along(load_left, hz) / 2 * np.array([[1], [-1]]))

    load = filtered(thumps() + knocks(), lean)
    steel = taps(patter_db) + splats(patter_db)
    spurts_db = 1.1 * wobble(10) + 0.7 * wobble(28)  # shared by patter and spray
    water = slosh_and_trickle(slosh_db, trickle_db) + patter(patter_db, spurts_db) + spray(spray_db, spurts_db)
    steady = water + rumble(rumble_db) + motor_hum()
    return load + steel + steady + house() + room(load[0] + steel[0])


def record(dry):
    """Left and right differ by a level tilt and a small lead; the deepest bass and top band are lost."""
    # (frequency [Hz], left minus right [dB])
    left_tilt = [(60, 1.5), (150, 0.5), (300, 3), (600, 3.5), (1300, 1.5), (2500, 4.5), (5500, 5.5),
                 (8000, 0.5), (15000, -0.5)]
    lead_s, lead_hz = .000022, 5800  # the left leads up to about lead_hz
    low_cut_hz, top_hz = 36, 15700

    def response(hz):
        lead = np.exp(1j * np.pi * hz * lead_s / (1 + (hz / lead_hz) ** 8))
        lean = (amp(along(left_tilt, hz) / 2) * lead) ** np.array([[1], [-1]])
        low_cut = 1 / (1 + (low_cut_hz / (hz + 1)) ** 6)
        return lean * low_cut * (hz < top_hz)

    return filtered(dry, response)


dry = scene()
out = record(dry)
wrap_up_sound(out)
```